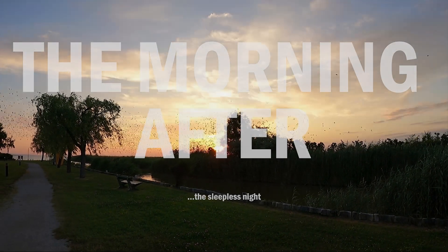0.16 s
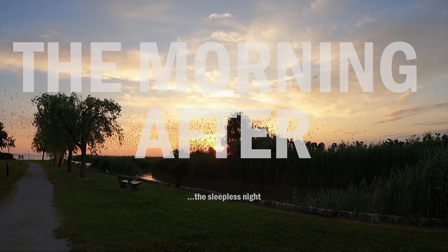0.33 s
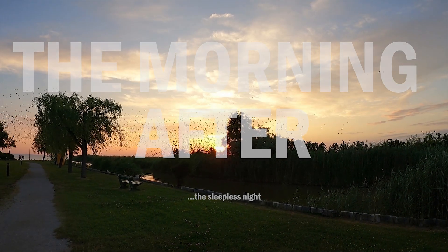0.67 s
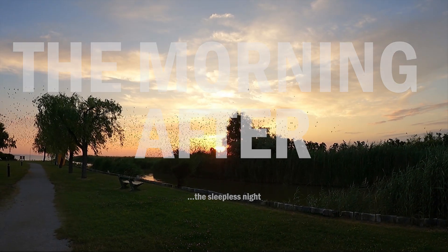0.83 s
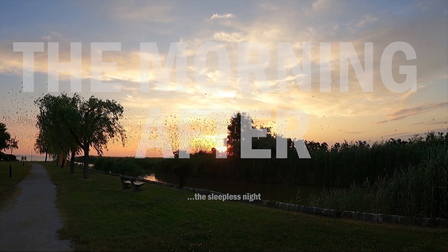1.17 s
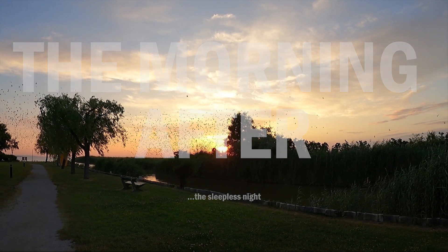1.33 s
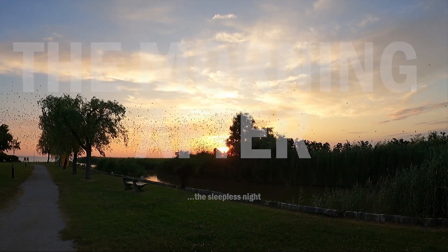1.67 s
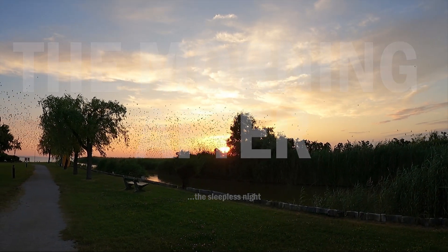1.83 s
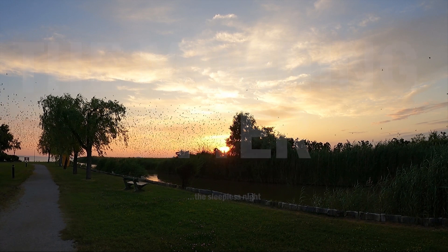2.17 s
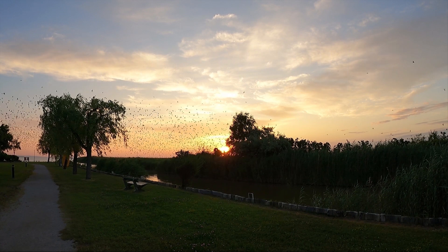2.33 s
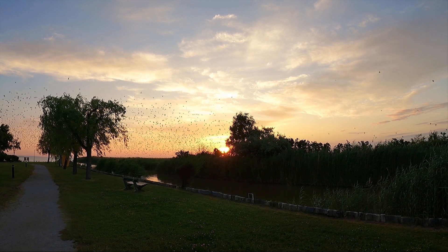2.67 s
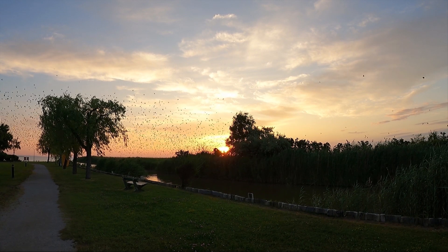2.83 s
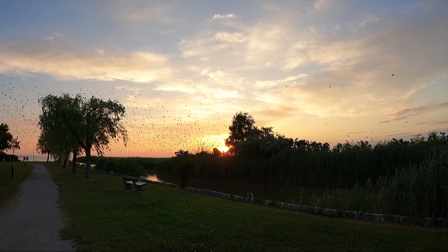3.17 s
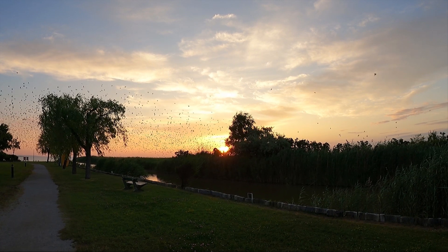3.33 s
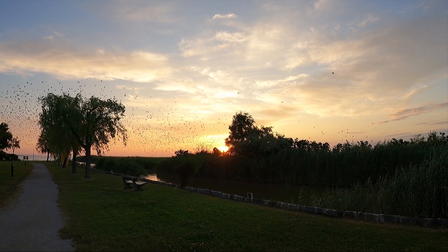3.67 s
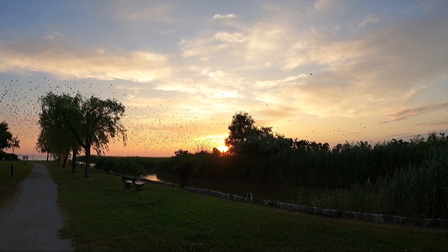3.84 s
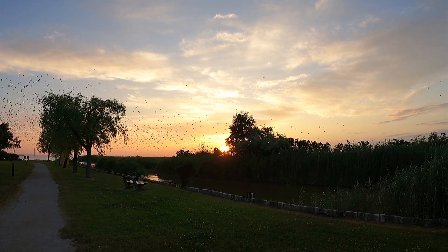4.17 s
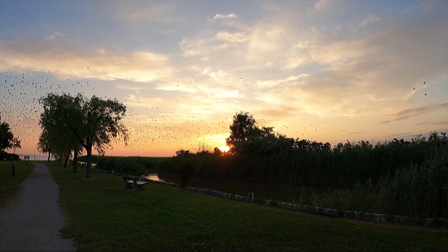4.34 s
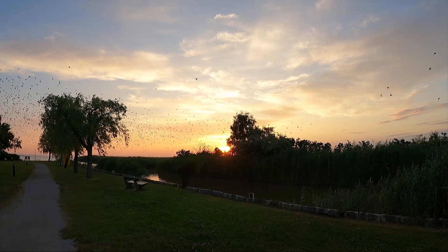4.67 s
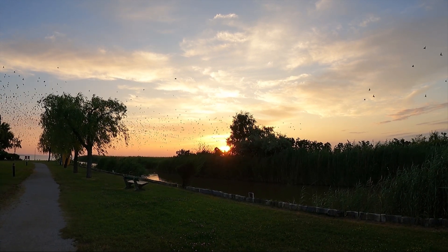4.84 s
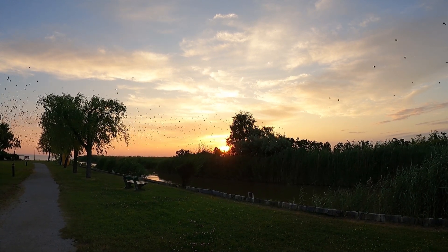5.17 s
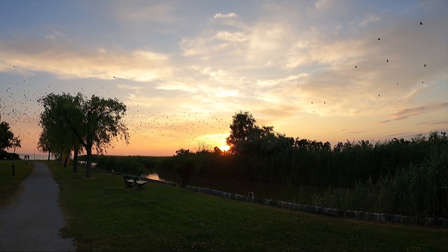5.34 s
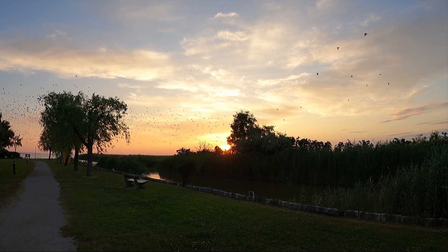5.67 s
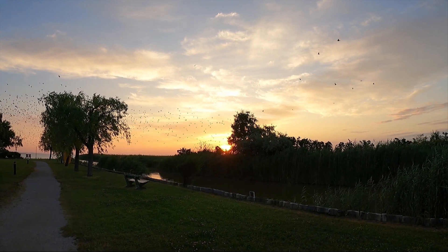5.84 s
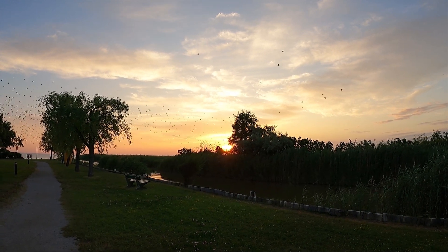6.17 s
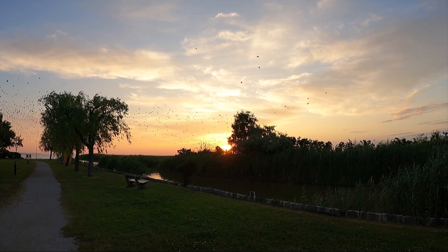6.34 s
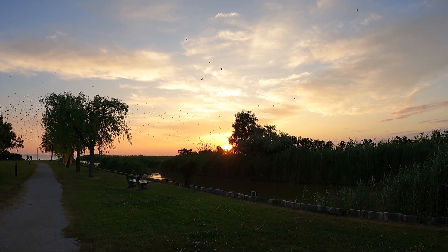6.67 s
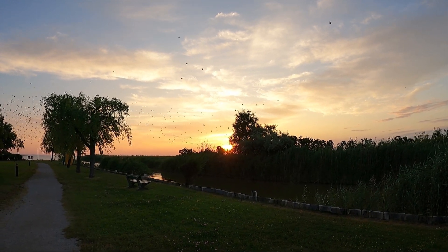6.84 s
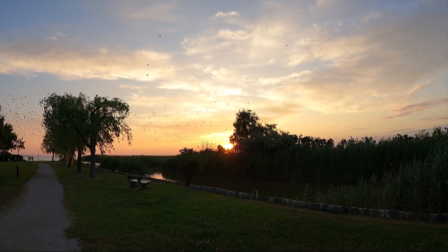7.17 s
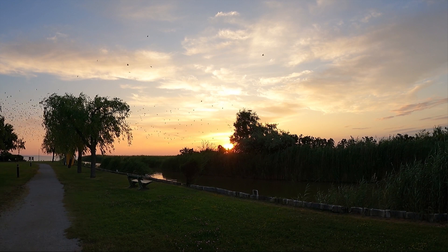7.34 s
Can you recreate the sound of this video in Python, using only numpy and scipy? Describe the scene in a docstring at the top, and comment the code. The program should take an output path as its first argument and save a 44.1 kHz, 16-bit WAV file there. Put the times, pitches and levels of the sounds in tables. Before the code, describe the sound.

A busy flock of small birds twitters outdoors, with near raspy chirps on the left, above low wind rumble and faint hiss.

```python
"""Swallow-like birds wheel over a lakeshore at dawn, in stereo, for 7.5 seconds.
From the start, shaped noise makes a gusty, slowly easing rumble, a wash that dies down and a steady hiss. Two hundred
faint chirps merge into chatter. Small damped knocks come near 0.2, 1.8, 2.2, 4.3 and 5 s. Buzzy falling chirps run
from 0.2 s to the end, with short sine pips from 1 s and gliding whistles from 1.35 s. Two-voiced calls come at
1.8 and 5.1 s. The near birds are to the left; ground, reeds and trees throw their sound back."""
import sys
import numpy as np
from scipy import signal
from scipy.fft import rfft, irfft
from scipy.io import wavfile
from scipy.ndimage import uniform_filter1d, map_coordinates

SR = 44100
rng = np.random.default_rng(int(sys.argv[2]) if len(sys.argv) > 2 else 0)


def master_out(mix):
    """Clip the mix to full scale and print it as 16-bit PCM to the path in sys.argv[1]."""
    frames = np.transpose(np.atleast_2d(mix))
    ceiling = np.clip(frames, -1, 1)
    pcm = np.round(ceiling * 32767).astype(np.int16)
    wavfile.write(sys.argv[1], SR, pcm)


N = 330849


def gain_of(db):
    """Turns decibels into a plain multiplier."""
    return 10 ** (np.asarray(db) / 20)


def evened(x):
    """Scales a sound to an average strength (rms) of 1."""
    return x / np.sqrt(np.mean(abs(x) ** 2) + 1e-20)


def read(points):
    """Reads a table over frequency at every bin of a full-length spectrum, on a logarithmic pitch scale."""
    hz, value = np.transpose(points)
    bins_hz = np.fft.rfftfreq(N, 1 / SR)
    return np.interp(np.log(bins_hz + 1), np.log(np.maximum(hz, 0) + 1), value)


def level(rows):
    """Turns a dB curve over time into a multiplier for every sample."""
    return gain_of(np.interp(np.arange(N) / SR, *np.transpose(rows)))


def filtered(x, gain):
    """Multiplies each frequency of a sound by its own gain."""
    return irfft(rfft(x) * gain, N)


def add(mix, s, sound):
    """Mixes a sound in at a time in seconds; a time before zero becomes zero."""
    part = mix[..., max(round(s * SR), 0):][..., :sound.shape[-1]]
    part += sound[..., :part.shape[-1]]


def wander(size, hz):
    """Smooth random wandering of rms about 1, mostly slower than about hz; long ones repeat."""
    white = rng.standard_normal(3 * 2 ** 12)
    f = np.fft.rfftfreq(len(white), 1 / SR)
    smooth = irfft(rfft(white) * np.exp(-.5 * (f / hz) ** 2))
    return np.resize(evened(smooth), size)


def drift(step_s):
    """Slow random drift for every sample: straight lines to a new value every step."""
    chance = rng.standard_normal(1024)
    return np.interp(np.arange(N) / SR / step_s, np.arange(len(chance)), chance)


def noise(colour):
    """Stereo noise of rms 1: the right side shares part of the left side's randomness at each frequency."""
    # left-right likeness of the background: f/Hz, coherence (1 = the same on both sides)
    likeness = [(25, 0.44), (60, 0.98), (130, 0.93), (600, 0.86), (1300, 0.66), (2800, 0.81), (6000, 1),
                (8000, 0.89), (13000, 0.95)]
    left, other = rfft(rng.standard_normal((2, N)))
    same = np.clip(read(likeness), -1, 1)
    right = same * left + np.sqrt(1 - same ** 2) * other
    return evened(irfft(np.array([left, right]) * gain_of(read(colour)), N))


def gusting():
    """Gain of the rumble: a slow easing, random swells and a few bell-shaped gusts."""
    # gusts on top of the rumble: t/s at the peak, half width/s, rise/dB
    gust_table = [(.39, 0.032, 6.5), (2.29, 0.097, 10), (3.58, 0.26, 7), (6.5, 0.071, 6), (7.0, 0.15, 9.5)]
    start_db, easing_db_per_s = -41, 0.93
    swell_db, swell_s = 0.5, .12
    t = np.arange(N) / SR
    gusts = sum(db * np.exp(-((t - s) / width) ** 2) for s, width, db in gust_table)
    return gain_of(start_db - easing_db_per_s * t + swell_db * drift(swell_s) + gusts)


def background(wash_db=3, air_db=-56):
    """Low rumble of moving air, a soft distant wash that dies down and a steady hiss, all shaped noise."""
    # tone colour of the rumble: f/Hz, relative level/dB
    rumble_colour = [(8, -15), (20, -0.5), (30, 2), (52, -3), (75, -6), (110, -14), (150, -18.5),
                     (180, -21.5), (250, -34), (500, -74)]
    # tone colour of the wash: f/Hz, relative level/dB
    wash_colour = [(80, -21), (170, 7), (280, -1), (420, 1), (620, 3), (850, -1), (1100, 3.5), (1700, -0.5),
                   (2600, -1.5), (5000, -6.5), (9000, -30)]
    # tone colour of the hiss: f/Hz, relative level/dB
    air_colour = [(500, -47), (900, -0.5), (1100, 0.5), (2000, 6.5), (3500, -6.5), (5000, -16), (7500, -10),
                  (8500, -14), (10800, -24), (12000, -28), (13500, -49)]
    # fading of the wash: t/s, level/dB before wash_db is added
    wash_fade = [(0, -51.5), (1.3, -55.5), (7.5, -63.5)]
    rumble = gusting() * noise(rumble_colour)
    wash = gain_of(wash_db) * level(wash_fade) * noise(wash_colour)
    hiss = gain_of(air_db) * noise(air_colour)
    return rumble + wash + hiss


def knocks(edge_hz=3000, upper_ratio=1.6, upper_db=-9):
    """Small knocks: two heavily damped tones with a noisy edge, dying away together."""
    # knocks and ticks: t/s, start level of the lower tone/dB, f/Hz, time to fall 60 dB/s, left above right/dB
    knock_table = [(0.165, -39, 1150, 0.016, 6), (0.179, -35, 270, 0.015, 4),
                   (1.786, -38, 1840, 0.0067, 18), (2.219, -34, 3100, .028, 7),
                   (2.279, -36, 754, .017, 20.5), (2.281, -25, 288, 0.016, 5),
                   (4.328, -33.5, 980, 0.016, 16), (4.966, -36, 730, 0.01, 14)]
    out = np.zeros((2, N))
    t = np.arange(2048) / SR
    soft = signal.butter(4, edge_hz, fs=SR)
    for s, db, hz, t60, pan_db in knock_table:
        upper = gain_of(upper_db) * np.sin(2 * np.pi * hz * upper_ratio * t)
        edge = signal.lfilter(*soft, rng.standard_normal(len(t)) + upper)
        ring = (np.sin(2 * np.pi * hz * t) + edge) * gain_of(db - 60 * t / t60)
        add(out, s, gain_of([[pan_db / 2], [-pan_db / 2]]) * ring)
    return out


def warble_cycle(turns):
    """One bird's repeating warble shape: four sine harmonics with random phases, rms 1."""
    strengths = (.75, .95, .65, .7)
    return evened(sum(a * np.sin(2 * np.pi * (k * turns + rng.random())) for k, a in enumerate(strengths, 1)))


def flutter(size, hz):
    """Random complex wandering that widens a pure tone into a husky band."""
    return (wander(size, hz) + 1j * wander(size, hz)) / np.sqrt(2)


def chirp(length, first_hz, last_hz, db, depth_hz, crest, bright_db=-28, bend=1.5, late=0.5):
    """One falling tone, swung by the rough, repeating warble of the syrinx (the bird's voice organ)."""
    warble_hz, jitter, stiffness, throb = 38, 0.554, 0.797, 0.28
    rasp, rasp_hz, hiss, hiss_hz, harsh_depth_hz = .36, 800, .12, 2300, 280
    shrill_hz, third_db, shrill_at = 900, -9, 0.29
    size = int(length * SR)
    u = np.linspace(0, 1, size)  # progress through the call
    warble_rate = warble_hz * rng.uniform(.92, 1.08) * (1 + 0.1199 * wander(size, 40.2))
    turns = np.cumsum(warble_rate) / SR
    # pitch and loudness each have their own warble shape
    swing = warble_cycle(turns)
    pulse = warble_cycle(turns)
    # the widest pitch swings are rounded off
    swing = evened(np.tanh(stiffness * (swing + jitter * wander(size, 324))))
    pitch_hz = first_hz + (last_hz - first_hz) * u ** bend + depth_hz * swing
    tone = np.exp(2j * np.pi * np.cumsum(pitch_hz) / SR)
    # irregular flutter of the membranes makes the tone husky; deeper warbles are huskier, up to a limit
    husk = rasp * flutter(size, rasp_hz) + hiss * flutter(size, hiss_hz)
    husk = husk * min(depth_hz / harsh_depth_hz, 1)
    # rough overtones (twice and three times the pitch) are strong early and fade to nothing by the end
    strain = np.interp(u, [0, shrill_at, 1], [1, 1, 0])
    overtones = tone ** 2 + gain_of(third_db) * tone ** 3
    overtones = gain_of(bright_db) * strain * flutter(size, shrill_hz) * overtones
    voice = evened(((tone * (1 + husk) + overtones) * np.exp(throb * pulse)).real)
    # crest: where the call is loudest, as a share of its length; late: loudness just before the end
    swell = np.interp(u, [0, .08, crest, .92, 1], [0, .5, 1, late, 0])
    return gain_of(db) * swell * voice


def shore(x, echo_db, t60):
    """Birds to the left, with scattered echoes from reeds and trees; the right hears them shaded and out of step."""
    # right side against the left: f/Hz, level/dB
    shade = [(1000, -9), (2200, -5), (3000, -3), (3500, -8), (4200, -8.5), (5000, -7.5), (6200, -10.5),
             (7200, -8), (7900, -0.5)]
    # right side against the left: f/Hz, phase ahead/radians
    lead = [(0, -4), (1200, 3), (2400, 1.4), (4600, 1.5), (5400, 1.2), (7000, 0), (8500, -0.4)]
    # scattered echoes at the right: f/Hz, level/dB
    right_echo = [(2000, 5.5), (4200, -13.5), (6200, -1.5), (7400, -4), (8200, -15)]
    # the microphone's dull treble on the birds: f/Hz, level/dB
    mic_treble = [(5000, -0.5), (6800, -1.5), (7600, -5.5), (8200, -16), (10000, -22.5), (13000, -20)]
    drift_s, wheel_s, drift_below_hz = .00003, .15, 5250
    t = np.arange(SR // 2) / SR
    # sparse random echoes, none in the first 6 ms, falling 60 dB in t60 seconds
    scattered = rng.standard_normal((2, len(t))) * (rng.random((2, len(t))) < .03) * (t > .006)
    taps = scattered * gain_of(-60 * t / t60)
    taps = taps / np.linalg.norm(taps, axis=1, keepdims=True)
    echoes = gain_of(echo_db) * signal.fftconvolve(x[None], taps, axes=1)[:, :N]
    left = x + echoes[0]
    # as the birds wheel, the lower part of their sound reaches the right a little earlier or later
    drifting = map_coordinates(left, [np.arange(N) + drift_s * SR * drift(wheel_s)], order=3)
    lower_part = 1 / (1 + (np.fft.rfftfreq(N, 1 / SR) / drift_below_hz) ** 20)
    drifting = left + filtered(drifting - left, lower_part)
    right = filtered(drifting, gain_of(read(shade)) * np.exp(1j * read(lead)))
    right = right + filtered(echoes[1], gain_of(read(right_echo)))
    return filtered(np.array([left, right]), gain_of(read(mic_treble)))


def far_flock(count=200, spread_db=2, flock_db=-3.0, low_hz=2200, high_hz=6400):
    """Two hundred distant chirps, high and low voices evenly mixed, that merge into one chatter."""
    # loudness of the flock: t/s, level/dB before flock_db is added
    flock_level = [(0, -42), (.45, -43.5), (1.05, -34.5), (2.4, -39), (3.1, -36), (4.35, -41), (4.7, -35.5),
                   (6.65, -40.5), (7.2, -29.5), (7.5, -37)]
    # filter on the flock's sound: f/Hz, relative level/dB
    flock_colour = [(1000, -42), (1800, -9.5), (2600, -4.5), (3400, -1), (4100, 3.5), (4600, -4),
                    (5200, -8.5), (6500, -15), (8000, -2.5), (11000, -39)]
    birds = np.zeros(N)
    starts = np.linspace(-.1, N / SR, count)
    # golden-ratio steps spread the voices evenly from low (0) to high (1)
    voices = (rng.random() + np.arange(count) * (np.sqrt(5) - 1) / 2) % 1
    # random for each chirp: delay/s, length/s, warble depth/Hz, size of the bird's level offset
    chance = rng.uniform([0, .08, 219.5, -1.0], [.04, .18, 466.0, 1.6], (count, 4))
    pitches_hz = low_hz + (high_hz - low_hz) * voices
    for s, hz, (delay, length, depth_hz, size) in zip(starts, pitches_hz, chance):
        add(birds, s + delay, chirp(length, hz * 1.09, hz * .91, spread_db * size, depth_hz, crest=.15))
    both = filtered(shore(birds, echo_db=-3.5, t60=1.0), gain_of(read(flock_colour)))
    # dividing by the left side's quarter-second strength steadies the crowd, whoever happens to call
    crowd = np.sqrt(abs(uniform_filter1d(both[0] ** 2, size=SR // 4)) + 1e-12)
    return gain_of(flock_db) * level(flock_level) * both / crowd


def pip(hz, db, length):
    """A few milliseconds of pure tone with quick fades at both ends."""
    t = np.arange(int(length * SR)) / SR
    return gain_of(db) * np.sin(2 * np.pi * hz * t) * signal.windows.tukey(len(t), .35)


def whistle(length, end_hz, turn_hz, db, lean=1.15, waver=0.018, octave_db=-30):
    """A nearly pure note that glides out to its turning pitch and back."""
    u = np.linspace(0, 1, int(length * SR))
    hz = end_hz + (turn_hz - end_hz) * np.sin(np.pi * u ** lean)
    phase = 2 * np.pi * np.cumsum(hz * (1 + waver * wander(len(u), 240))) / SR
    note = evened(np.sin(phase) + gain_of(octave_db) * np.sin(2 * phase))
    return gain_of(db) * note * signal.windows.tukey(len(u), .2)


def slurred_call(burst_db, slur_db):
    """Both sides of the syrinx at once: a high harsh burst breaks off, a clear slur levels out and fades."""
    call = np.zeros(SR // 3)
    add(call, 0, chirp(0.083, 4950, 4600, burst_db, depth_hz=457, crest=.85, bright_db=-24))
    add(call, 0, chirp(.21, 4200, 2960, slur_db, depth_hz=160, crest=0.23, bright_db=-24.5, bend=0.76, late=0.16))
    return call


def buzz(length, hz, db, bright_db, above=.4):
    """A near chirp sags from above its pitch to below it; louder and higher ones warble deeper."""
    sag_hz_per_s = 3000
    usual_depth_hz, usual_db, usual_hz = 278, -32, 4016
    deeper_hz_per_db, deeper_with_pitch = 3, 0.18
    sag = sag_hz_per_s * length
    depth_hz = usual_depth_hz + deeper_hz_per_db * (db - usual_db)
    depth_hz += deeper_with_pitch * max(hz - usual_hz, 0)
    return chirp(length, hz + above * sag, hz - (1 - above) * sag, db, depth_hz, crest=0.51, bright_db=bright_db)


def near_birds(chirp_db=-0.45, bounce=0.3, shrill_db=3):
    """Each chirp arrives directly and again off the ground; whistles and pips sound between them."""
    # buzzy chirps: t/s, length/s, f/Hz, level/dB before chirp_db, overtones/dB before shrill_db
    chirp_table = [(0.183, 0.04, 3950, -41.5, -30), (0.518, 0.074, 4370, -41.5, -11),
                   (0.677, 0.26, 4140, -40, -16), (0.893, 0.22, 4096, -34, -25),
                   (1.046, 0.25, 4145, -29, -21.5), (1.164, .16, 3425, -38.5, -10),
                   (1.33, 0.16, 4140, -34.5, -19), (1.496, 0.14, 4070, -32.5, -11),
                   (1.628, 0.11, 5230, -38, -9), (1.734, 0.15, 4040, -36, -20),
                   (2.007, 0.24, 4170, -29.5, -21), (2.466, .15, 4000, -36.5, -13),
                   (2.605, 0.15, 3970, -30.5, -16.5), (2.723, .2, 3496, -37.5, -35),
                   (2.891, 0.2, 4100, -28.5, -29), (3.146, 0.21, 3960, -31.5, -13.5),
                   (3.16, 0.15, 5660, -39.5, -26), (3.318, 0.13, 3850, -33.5, -22),
                   (3.505, 0.14, 3950, -34.5, -20), (3.571, .17, 4150, -30, -30),
                   (3.8, 0.076, 4520, -34, -18), (3.822, 0.18, 3944, -29, -27),
                   (3.941, 0.18, 4070, -28.5, -21), (4.1, 0.25, 3872, -32, -43),
                   (4.462, 0.11, 4050, -34, -28), (4.525, .27, 4047, -28.5, -17),
                   (4.749, .18, 4105, -32.5, -24), (4.902, .21, 3850, -29, -22),
                   (5.335, .15, 4076, -33, -16.5), (5.43, .23, 4210, -27.5, -20),
                   (5.603, .18, 4080, -31, -41), (5.883, 0.22, 3980, -32.5, -25),
                   (5.968, 0.12, 4760, -35, -38), (6.011, 0.13, 2986, -40.5, -29),
                   (6.105, 0.14, 4265, -31, -15), (6.176, 0.072, 3710, -30, -29),
                   (6.399, 0.27, 4095, -32.5, -43), (6.632, .19, 4096, -30.5, -45),
                   (7.01, .18, 4193, -24, -21), (7.14, 0.15, 3670, -32.5, -34),
                   (7.263, 0.13, 3966, -31.5, -19), (7.354, .15, 4060, -26, -28)]
    # two-voiced calls: t/s, burst level/dB, slur level/dB, both before chirp_db
    slurred_table = [(1.798, -32, -27.5), (5.098, -33.5, -28)]
    # clear whistles: t/s, length/s, f at the ends/Hz, f at the turn/Hz, level/dB before the shore
    whistle_table = [(1.354, 0.062, 4100, 5580, -37), (4.725, 0.043, 4120, 5360, -35.5),
                     (4.742, 0.046, 4160, 5740, -43), (5.785, 0.059, 6000, 5480, -46),
                     (5.865, .03, 5400, 6180, -47.5), (6.402, .13, 2650, 2740, -55),
                     (6.75, .08, 2520, 2470, -48), (6.921, 0.088, 2480, 2550, -49),
                     (7.372, 0.042, 4200, 5400, -36), (7.394, 0.107, 6480, 6260, -44.5)]
    # short pure pips: t/s, f/Hz, peak level/dB before the shore, length/s
    pip_table = [(1.004, 3970, -27, 0.013), (1.705, 4180, -25, 0.0088), (2.54, 3750, -25, 0.01),
                 (2.813, 3930, -26.5, 0.0033), (3.653, 4400, -26, 0.0096), (5.424, 3910, -24.5, 0.0092),
                 (5.9578, 4030, -19, .0045), (5.972, 4040, -23, 0.0038), (6.056, 3900, -24, 0.014),
                 (7.332, 4060, -20.5, 0.0071)]
    birds = np.zeros(N)
    calls = []
    for s, length, hz, db, bright_db in chirp_table:
        calls.append((s, buzz(length, hz, db, bright_db + shrill_db)))
    for s, burst_db, slur_db in slurred_table:
        calls.append((s, slurred_call(burst_db, slur_db)))
    for s, call in calls:
        direct = gain_of(chirp_db) * call
        add(birds, s, direct)
        add(birds, s + rng.uniform(.003, .012), bounce * direct)
    for s, *shape in whistle_table:
        add(birds, s, whistle(*shape))
    for s, *shape in pip_table:
        add(birds, s, pip(*shape))
    return shore(birds, echo_db=-15, t60=0.26)


def scene():
    """All sources together, left and right."""
    return background() + knocks() + near_birds() + far_flock()


def record(dry):
    """The band limit of the recorder: a low-pass filter at 13.4 kHz."""
    low_pass = signal.firwin(511, 13400, window=("kaiser", 9), fs=SR)
    return signal.oaconvolve(dry, low_pass[None], "same")


dry = scene()
out = record(dry)
master_out(out)
```